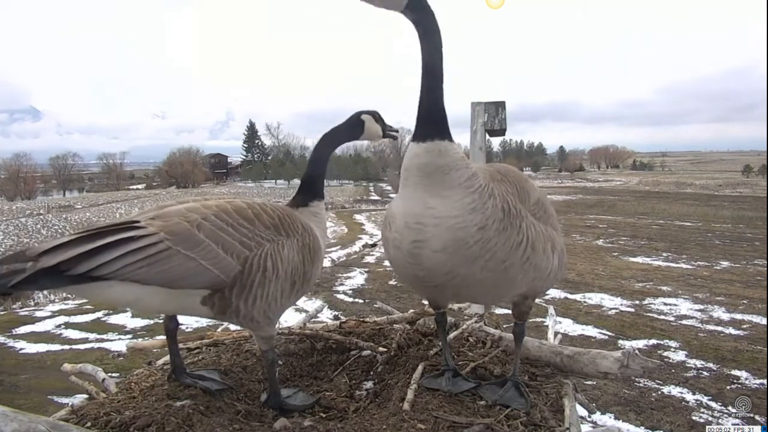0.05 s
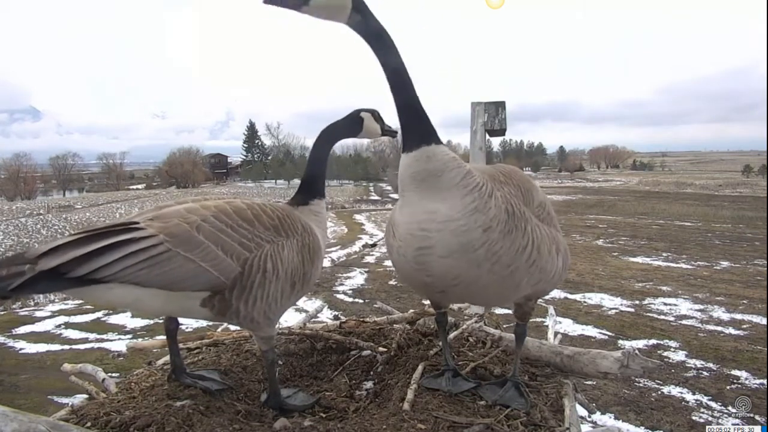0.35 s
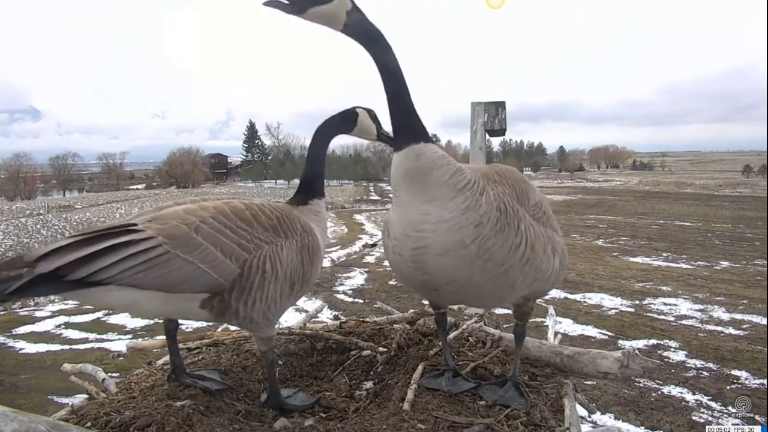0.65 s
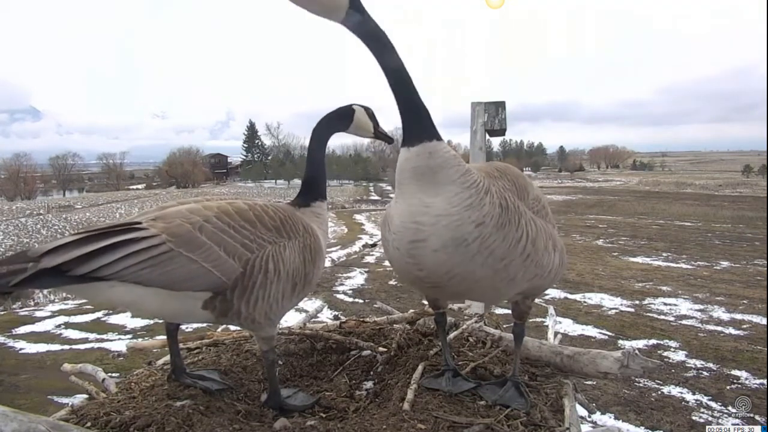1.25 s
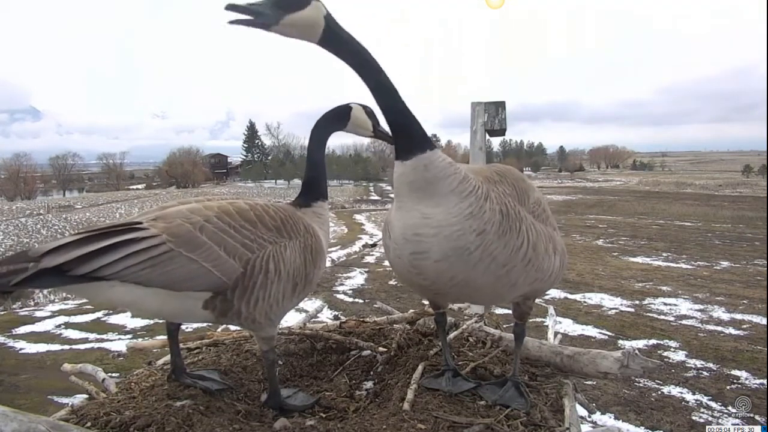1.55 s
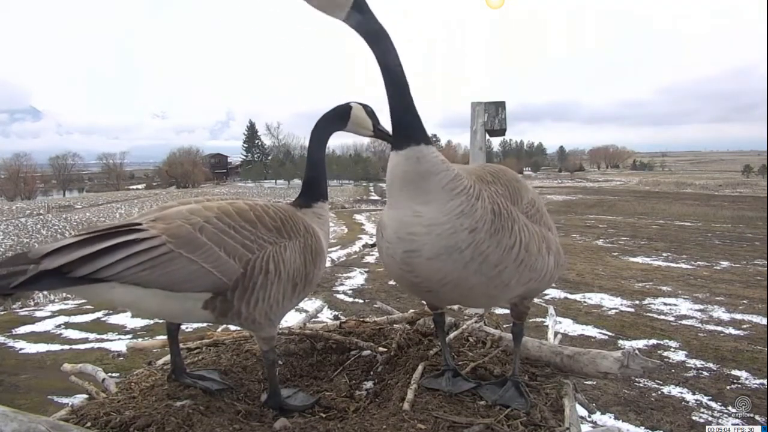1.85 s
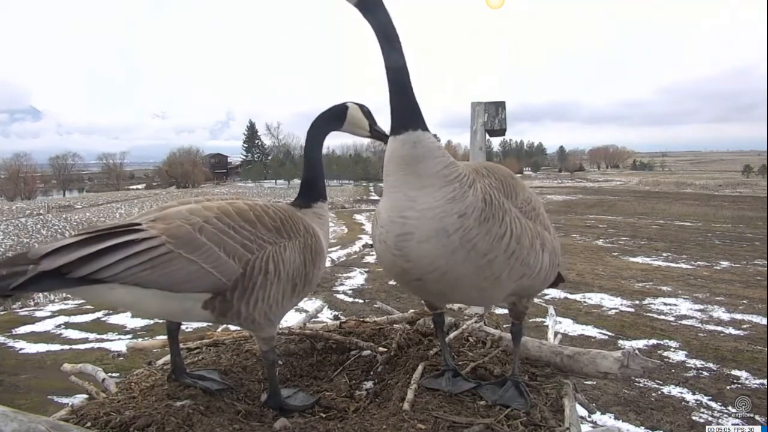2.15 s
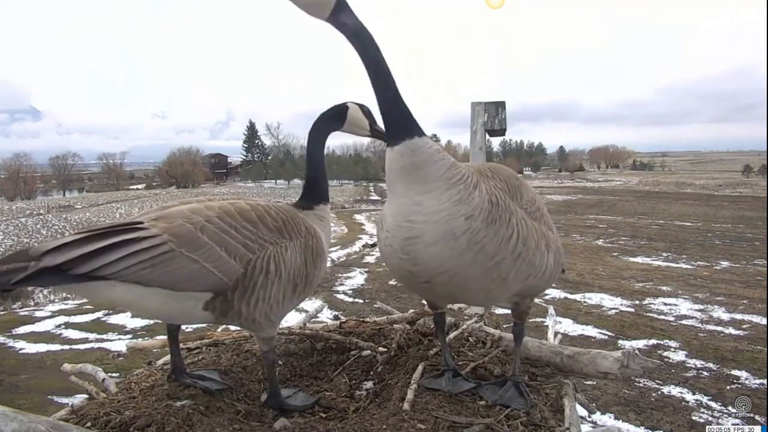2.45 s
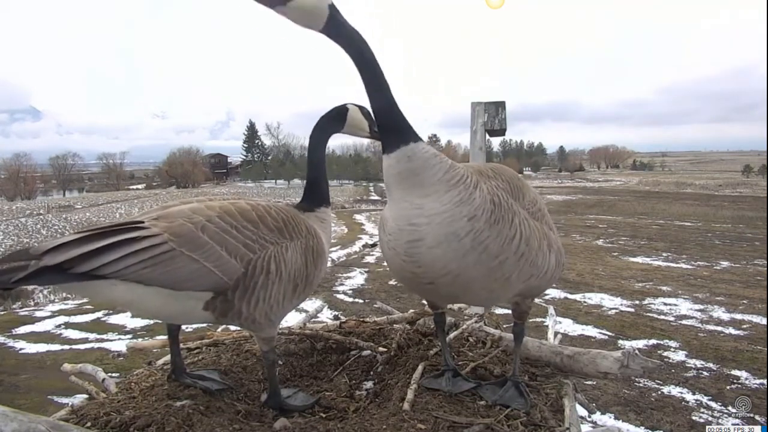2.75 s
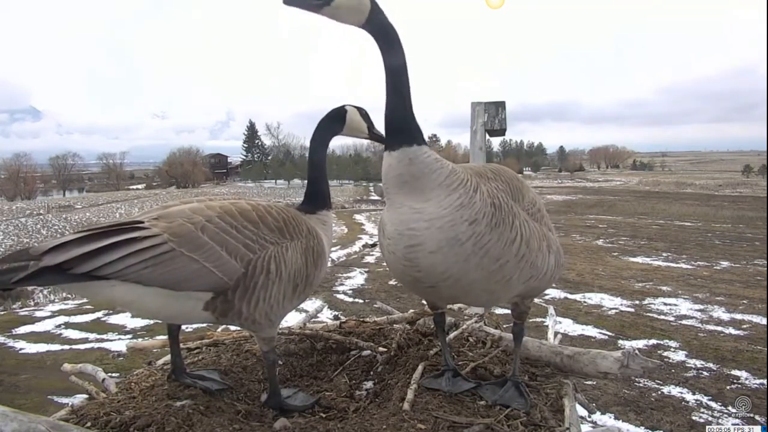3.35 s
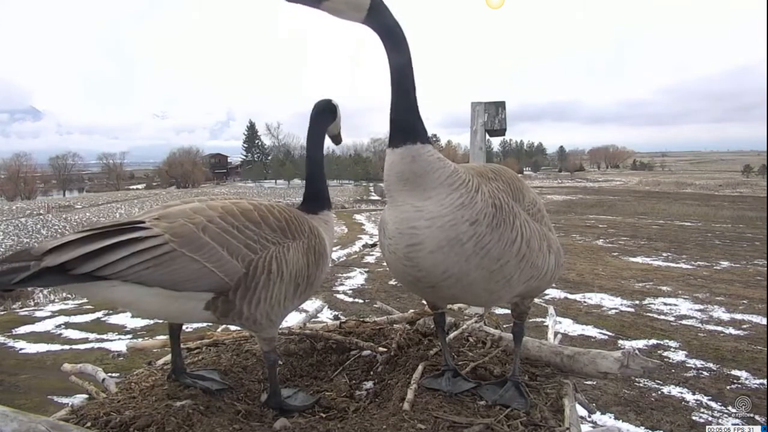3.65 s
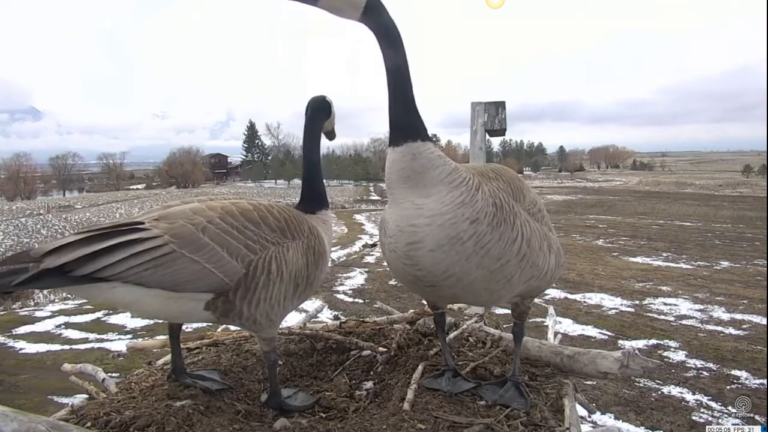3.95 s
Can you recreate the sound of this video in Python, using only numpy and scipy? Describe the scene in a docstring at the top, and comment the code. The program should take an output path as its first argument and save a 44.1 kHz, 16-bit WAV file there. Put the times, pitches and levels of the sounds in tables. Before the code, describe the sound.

Geese honk harshly and rapidly up close, then drop to faint low grunts.

```python
"""Two geese at their nest

Close calls in an open field, long and harsh alternating with short; the microphone overloads a little.
Membrane slaps ring the throat in a rattling growl, which breaks into a falling honk or a hoarse squawk.
Soft calls, low grunts and ticking twigs follow. The field returns a weak echo over a distant rumble."""
import sys
import numpy as np
from scipy import signal
from scipy.fft import rfft, irfft
from scipy.io import wavfile
from scipy.ndimage import uniform_filter1d

SR = 44100
rng = np.random.default_rng(int(sys.argv[2]) if len(sys.argv) > 2 else 0)


def master(y):
    """Save y as 16-bit WAV."""
    cut = np.clip(np.atleast_2d(y).T, -1, 1)
    pcm = np.round(cut * 32767)  # scale
    wavfile.write(sys.argv[1], SR, pcm.astype(np.int16))


N = 176400

# throat response in a growl: freq_hz, gain_db
GROWL_THROAT = [(50, -38), (105, -22), (150, -17.5), (230, -24), (370, -23.5), (500, -2.5), (800, -0.5),
                (1050, -2.5), (1400, 3), (1750, -19), (2050, -11), (2500, -19), (3200, -26.5),
                (4600, -24.5), (6500, -34.5), (8500, -50.5), (13000, -56.5)]
GROWL_FALL_DB_PER_S, PULSE_JITTER, DULL_HZ = -1100, .018, 1872


def amp(db):
    """Decibels to gain."""
    return 10 ** (np.asarray(db) / 20)


def unit_rms(x):
    """Scale to rms 1."""
    return x / np.sqrt(np.mean(x ** 2) + 1e-20)


def db_at(colour, hz):
    """Interpolate a spectrum over log frequency."""
    freq_hz, gain_db = np.transpose(colour)
    return np.interp(np.log(hz + 1), np.log(freq_hz + 1), gain_db)


def add(mix, start_s, sound):
    """Mix a sound in, cropped at both ends."""
    at = round(start_s * SR)
    sound = sound[max(-at, 0):]
    part = mix[max(at, 0):][:len(sound)]
    part += sound[:len(part)]


def call_time():
    """Time axis of one call, in seconds."""
    return np.arange(SR // 2) / SR


def wobble(cutoff_hz):
    """Low-passed noise of rms 1."""
    hz = np.fft.rfftfreq(SR // 2, 1 / SR)
    return unit_rms(irfft(rfft(rng.standard_normal(SR // 2)) / (1 + (hz / cutoff_hz) ** 4)))


def past(t, end_s, knee_s=.004):
    """Seconds since end_s, with a rounded corner."""
    return knee_s * np.logaddexp(0, (t - end_s) / knee_s)


def soft_step(t, centre_s, width_s=.018):
    """Smooth step from 0 to 1."""
    return .5 + .5 * np.tanh((t - centre_s) / width_s)


def resonate(x, colour, size=4096):
    """Ring x through a minimum-phase filter; output rms 1."""
    log_gain = np.log(amp(db_at(colour, abs(np.fft.fftfreq(size, 1 / SR)))))
    ring = np.fft.ifft(np.exp(np.conj(signal.hilbert(log_gain)))).real[:size // 2]
    return unit_rms(signal.fftconvolve(x, ring)[:len(x)])


def rumble(wash_db=-55.5, drone_db=-54.5, drone_hz=128, width_hz=14):
    """Distant rumble with a wavering low drone."""
    # background spectrum: freq_hz, gain_db
    wash_colour = [(15, -80.5), (25, -55.5), (81, -24.5), (127, -3), (152, -18), (198, -9.5), (285, -13.5),
                   (411, -26), (445, -32.5), (507, -24.5), (1270, -31.5), (2310, -34), (4690, -44),
                   (11400, -55.5), (13000, -77.5)]
    hz = np.fft.rfftfreq(N, 1 / SR)
    wash = irfft(rfft(rng.standard_normal(N)) * amp(db_at(wash_colour, hz)), N)
    drone = irfft(rfft(rng.standard_normal(N)) / (1 + ((hz - drone_hz) / width_hz) ** 2), N)
    return amp(wash_db) * unit_rms(wash) + amp(drone_db) * unit_rms(drone)


def field_echo(x):
    """Scatter from the nest, a thin bright echo from the brush and a weak outdoor tail."""
    t, response = call_time(), np.zeros(SR)
    nest, brush, tail = (.002, -25, .003, 20), (.075, -34, .038, 4000), (.02, -45, .11, 20)
    for delay_s, level_db, decay_s, low_cut_hz in (nest, brush, tail):
        taps = rng.standard_normal(len(t)) * np.exp(-t / decay_s)
        taps = amp(level_db) * taps / np.linalg.norm(taps)
        add(response, delay_s, signal.lfilter(*signal.butter(1, low_cut_hz, "high", fs=SR), taps))
    return signal.fftconvolve(x, response)[:N]


def twig(level_db, decay_s=.0047):
    """A dry twig gives underfoot with a tick."""
    # tick spectrum: freq_hz, gain_db
    tick_colour = [(500, -31), (2500, -19), (5000, 0), (8000, -14), (13000, -30)]
    t = call_time()
    return amp(level_db) * np.exp(-t / decay_s) * resonate(rng.standard_normal(len(t)), tick_colour)


def whine(length_s, pitch_hz, level_db, sag=.095, partial_step_db=-6):
    """A soft note of three partials that sags at its end."""
    progress = np.minimum(call_time() / length_s, 1)
    phase = 2 * np.pi * np.cumsum(pitch_hz * (1 - sag * progress ** 4)) / SR
    tone = sum(amp(partial_step_db * k) * np.sin((k + 1) * phase) for k in range(3))
    return amp(level_db) * np.sqrt(abs(np.sin(np.pi * progress))) * tone


def chest(length_s, pulse_hz, level_db):
    """The body hums at the pulse rate, most in mid-growl."""
    progress = np.minimum(call_time() / length_s, 1)
    hum = unit_rms(np.sin(2 * np.pi * np.cumsum(pulse_hz) / SR))
    return amp(level_db) * 4 * progress * (1 - progress) * hum


def membrane(pulse_hz, shimmer_db=1.5, puff_db=4, puff_cycles=.14):
    """Uneven membrane slaps, each followed by a puff of air."""
    cycles = np.cumsum(pulse_hz) / SR
    slaps = (np.diff(np.floor(cycles), prepend=-1) > 0) * amp(shimmer_db * wobble(100))
    puffs = np.exp(-(cycles % 1) / puff_cycles) * rng.standard_normal(len(pulse_hz))
    return unit_rms(slaps) + amp(puff_db) * unit_rms(puffs)


def swell(length_s, level_db, swell_db, rise_s=.0021):
    """Growl envelope: grows to full level, then stops quickly."""
    t = call_time()
    attack = 1 - .5 * np.exp(-t / rise_s)
    shortfall_db = swell_db * np.maximum(1 - t / length_s, 0)
    return attack * amp(level_db - shortfall_db + GROWL_FALL_DB_PER_S * past(t, length_s))


def growl(length_s, rate_hz, level_db, swell_db, colour, chest_db=-22):
    """Slow pulses ring the throat and brighten with effort."""
    pulse_hz = rate_hz * (1 + PULSE_JITTER * wobble(120))
    bright = resonate(membrane(pulse_hz), colour)
    dull = signal.sosfiltfilt(signal.butter(3, DULL_HZ, fs=SR, output="sos"), bright)
    effort = np.minimum(call_time() / length_s, 1)
    voice = swell(length_s, level_db, swell_db) * (dull + effort * (bright - dull))
    return voice + chest(length_s, pulse_hz, level_db + chest_db)


def lead_in(length_s, rate_hz, level_db):
    """Soft first slaps: without effort the voice has no treble."""
    slaps = growl(length_s, rate_hz, level_db, 0, GROWL_THROAT)
    return signal.sosfilt(signal.butter(4, DULL_HZ, fs=SR, output="sos"), slaps)


def rasp(length_s, rate_hz, level_db, swell_db, voice_hz, fast_db=2, chest_db=-19.5):
    """Long harsh growl: two membranes beat at unrelated rates, climb with effort and drop at the end."""
    # clean partials of the faster membrane: harmonic_number
    harmonics = [2, 3, 4, 5]
    # their strengths: level_db
    harmonic_db = [-4, -7, -10, -8]
    t = call_time()
    climb = np.sin(np.pi / 2 * np.minimum(t / length_s / .57, 1))
    bend = 1 + .15 * (climb - .8) - .2 * soft_step(t, length_s)
    fast_hz = voice_hz * bend * (1 + .022 * wobble(220))
    slow_hz = rate_hz * bend * (1 + PULSE_JITTER * wobble(120))
    phase = 2 * np.pi * np.cumsum(fast_hz) / SR
    tone = sum(amp(db) * unit_rms(np.cos(k * phase + rng.uniform(0, 2 * np.pi)))
               for k, db in zip(harmonics, harmonic_db))
    rattle = resonate(membrane(slow_hz) + amp(fast_db) * membrane(fast_hz), GROWL_THROAT)
    voice = swell(length_s, level_db, swell_db) * unit_rms(rattle + tone)
    return voice + chest(length_s, slow_hz, level_db + chest_db)


def squawk(length_s, voice_hz, level_db, drop=.15, jitter=.0067, rise_s=.002):
    """A rasp fails to break into a honk: the faster membrane takes over in a hoarse, falling cry."""
    # partials of the cry: harmonic_number
    harmonics = [2, 3, 4, 5, 6]
    # their strengths: start_db, end_db
    harmonic_db = [(-3, -12), (-12.5, -21.5), (-12, 2), (2.5, -2.5), (-22.5, -18.5)]
    t = call_time()
    hz = voice_hz * (1 - drop * soft_step(t, length_s)) * (1 + jitter * wobble(250))
    phase = 2 * np.pi * np.cumsum(hz) / SR
    progress = np.minimum(t / length_s, 1)
    cry = sum(amp(start_db + (end_db - start_db) * progress) * np.cos(k * phase)
              for k, (start_db, end_db) in zip(harmonics, harmonic_db))
    return (1 - np.exp(-t / rise_s)) * amp(level_db + GROWL_FALL_DB_PER_S * past(t, length_s)) * cry


def honk(hold_s, pitch_hz, level_db, roughness, tilt_db_per_oct, fall_hz_per_s, rise_s):
    """The voice breaks roughly into a high note, which clears, sinks and loses its overtones."""
    # throat response in a honk: freq_hz, gain_db
    throat = [(300, -35.5), (500, -8.5), (720, -7), (1050, 0.5), (1430, -2), (1750, -8.5), (2150, -18.5),
              (2850, -32.5), (3600, -26.5), (4300, -19.5), (5200, -29), (7200, -40.5), (13000, -53.5)]
    break_s, scoop_s, drop_s, opening_s = .011, .0028, .0095, .005
    sag_db_per_s, release_db_per_s, closing_db_per_s, dulling_db_per_oct_s = -55.5, -850, -750, -500
    t = call_time() - rise_s
    age_s, released_s = np.maximum(t, 0), past(t, hold_s)
    rough = roughness * np.exp(-age_s / hold_s / 2) + .6 * np.exp(-age_s / break_s)

    bend = 1 - .13 * soft_step(t, hold_s + drop_s, 2 * drop_s) - .05 * np.exp(-age_s / scoop_s)
    jitter = 1 + .034 * rough * wobble(300)
    hz = (pitch_hz - fall_hz_per_s * np.minimum(age_s, hold_s)) * bend * jitter
    phase = 2 * np.pi * np.cumsum(hz) / SR

    k = np.arange(1, 20)[:, None]
    octaves = np.log2(np.maximum(k / 2, 1))  # above the second harmonic
    closing_db = closing_db_per_s * released_s
    treble_db = octaves * (tilt_db_per_oct + dulling_db_per_oct_s * released_s)
    gains = amp(db_at(throat, k * hz) + (k > 1) * closing_db + treble_db)
    opening = 1 - np.minimum(octaves, 1) * np.exp(-age_s / opening_s)
    tone = (gains * opening * np.cos(k * phase + rng.uniform(0, 2 * np.pi, k.shape))).sum(0)

    hoarse = [(f, db + np.log2(max(f / pitch_hz / 2, 1)) * (tilt_db_per_oct + 2)) for f, db in throat]
    noise = resonate((1 + np.cos(phase)) * rng.standard_normal(len(t)), hoarse)
    attack = np.sin(np.pi / 2 * np.clip((t / rise_s + 1) / 2, 0, 1)) ** 2
    envelope = attack * amp(level_db + sag_db_per_s * age_s + release_db_per_s * released_s)
    return envelope * (1.66 * tone + amp(2 * closing_db - .5) * rough * noise)


def scene(honk_rise_s=.009, lead_s=.014, lead_db=-7.5):
    """Calls and twigs with their echo, over the rumble; mono."""
    # loud and soft honks: start_s, hold_s, pitch_hz, level_db, roughness, tilt_db_per_oct, fall_hz_per_s
    honks = [(.125, 0.035, 737.6, -7, 0.24, -2.5, 297), (0.399, 0.036, 746.6, -8.5, 0.02, -3, 597),
             (.565, 0.031, 753.2, -7, 0.2, 0, 2000.5), (0.697, .031, 746, -9, .14, -1.5, 498.5),
             (0.908, 0.039, 736.8, -5, .25, 1.5, 1901), (1.101, 0.032, 729.8, -9, 0.15, -2.5, 514.5),
             (1.436, 0.032, 739.3, -8.5, 0.13, -1.5, 399), (1.718, 0.029, 755.3, -9, 0.47, 2, 1801.5),
             (1.823, 0.033, 738, -10, .2, -3, 700), (2.159, .033, 741.7, -9, 0.13, -2, 504),
             (2.39, 0.042, 801, -44, 0.48, -7.5, 800), (2.845, 0.029, 726, -52.5, 0.98, -8, -0.5)]
    # short growls: start_s, length_s, rate_hz, level_db, swell_db
    growls = [(.357, 0.055, 160, -11, 20), (.644, 0.061, 164, -12, 21), (1.047, 0.069, 174, -14.5, 14),
              (1.39, 0.056, 164, -15, 9.5), (1.775, 0.049, 165, -14, 12.5), (2.115, 0.043, 159, -11, 18)]
    # long harsh growls: start_s, length_s, rate_hz, level_db, swell_db, voice_hz
    rasps = [(-.01, 0.14, 140.4, -12.5, 8, 251.6), (0.455, 0.14, 143, -14.5, 6.5, 264.2),
             (0.824, 0.097, 143, -12, 7.5, 256.4), (1.258, .124, 145.4, -10.5, 8.5, 253.7),
             (1.625, 0.13, 141, -11.5, 7, 259.6), (1.986, .12, 148, -10.5, 9.5, 250)]
    # soft grunts: start_s, length_s, rate_hz, level_db
    grunts = [(2.579, 0.094, 150, -52), (2.803, .05, 130, -60.5), (3.758, 0.039, 103, -44.5),
              (3.804, 0.05, 102, -49.5), (3.849, 0.037, 110, -42.5), (3.907, 0.021, 123, -52)]
    # throat response in a grunt: freq_hz, gain_db
    grunt_throat = [(60, -38), (150, 1), (450, -3), (800, 1), (1300, -9.5), (1700, -26), (3200, -28.5),
                    (6000, -41), (13000, -58)]
    # hoarse cries: start_s, length_s, voice_hz, level_db
    squawks = [(1.336, 0.04, 254.4, -8.5), (2.058, 0.0457, 243.7, -12.5)]
    # faint whine: start_s, length_s, pitch_hz, level_db
    whines = [(2.225, .09, 520, -44)]
    # twig ticks: start_s, level_db
    twigs = [(2.897, -62), (3.03, -59), (3.056, -62.5), (3.075, -67), (3.275, -60.5), (3.515, -59)]
    geese = np.zeros(N)
    for start_s, *row in honks:
        add(geese, start_s - honk_rise_s, honk(*row, honk_rise_s))
    for start_s, *row in growls:
        add(geese, start_s, growl(*row, GROWL_THROAT))
    for start_s, length_s, rate_hz, level_db, swell_db, voice_hz in rasps:
        add(geese, start_s - lead_s, lead_in(lead_s, rate_hz, level_db - swell_db + lead_db))
        add(geese, start_s, rasp(length_s, rate_hz, level_db, swell_db, voice_hz))
    for start_s, *row in grunts:
        add(geese, start_s, growl(*row, swell_db=0, colour=grunt_throat))
    for events, source in [(squawks, squawk), (whines, whine), (twigs, twig)]:
        for start_s, *row in events:
            add(geese, start_s, source(*row))
    return (geese + field_echo(geese) + rumble())[None]


def record(dry, ceiling=.95, knee=5, low_cut_hz=24, high_cut_hz=13250):
    """Soft overload shifts the bias into a low thump; low and high cuts follow."""
    clipped = dry / (1 + abs(dry / ceiling) ** knee) ** (1 / knee)
    bias = .35 * uniform_filter1d(abs(dry - clipped), size=500)
    x = signal.lfilter(*signal.butter(1, low_cut_hz, "high", fs=SR), clipped + bias)
    return signal.oaconvolve(x, signal.firwin(255, high_cut_hz, window=("kaiser", 9), fs=SR)[None], "same")


dry = scene()
out = record(dry)
master(out)
```